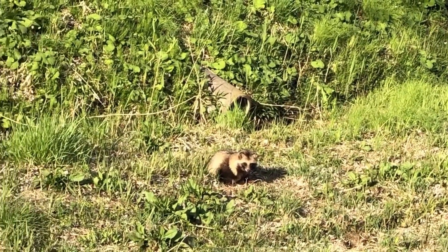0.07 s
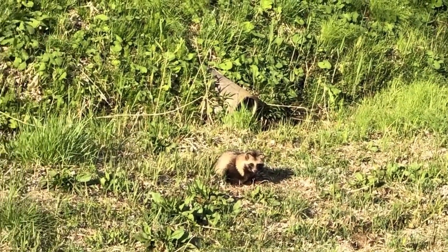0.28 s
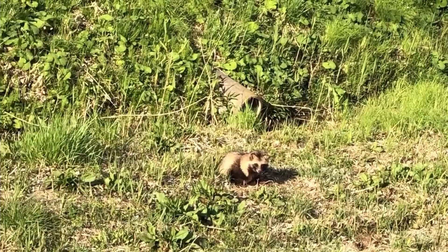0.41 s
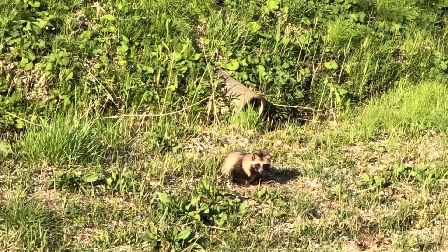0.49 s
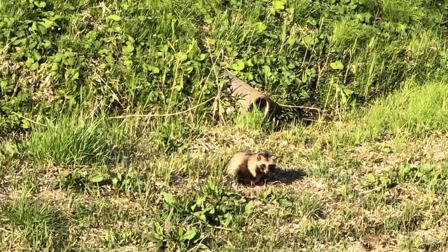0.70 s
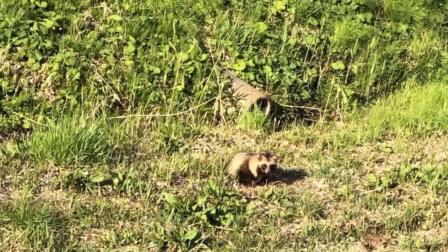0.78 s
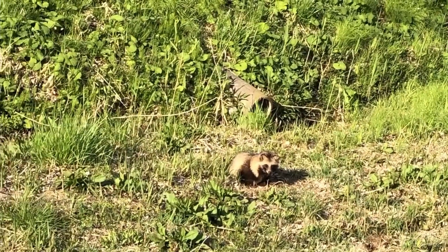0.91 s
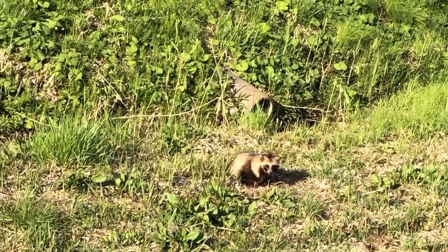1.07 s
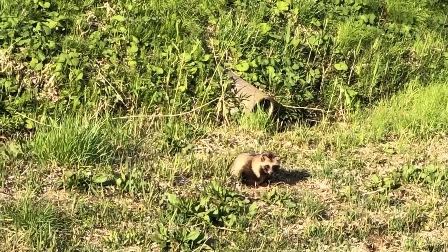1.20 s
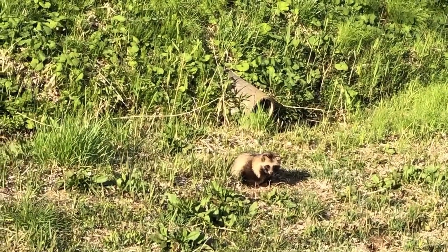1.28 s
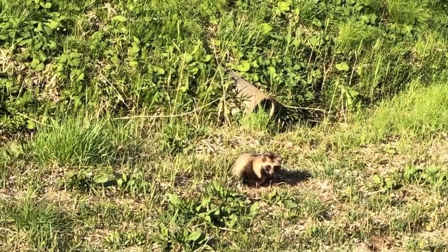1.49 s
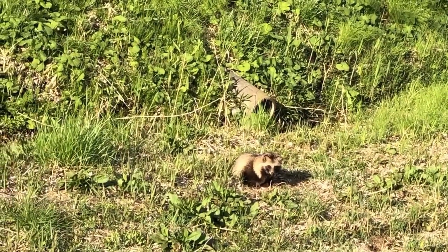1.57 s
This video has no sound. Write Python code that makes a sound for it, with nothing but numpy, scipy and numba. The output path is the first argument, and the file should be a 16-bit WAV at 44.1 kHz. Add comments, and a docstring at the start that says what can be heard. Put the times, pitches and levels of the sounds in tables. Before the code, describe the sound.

A raccoon dog chitters outdoors. After faint low air rumble and distant hum, a weak raspy chirp at 0.23 s leads into seven shrill yelps, evenly spaced about 0.06 s apart, until 0.67 s. A pause follows; a faint rasp at 1.04 s, two strong yelps at 1.09 and 1.16 s, and a short rough one at 1.26 s. Brief ground and leaf reflections; limited, glassy treble.

```python
"""Raccoon dog, two runs of yelps

On a grassy patch, a raccoon dog chitters two quick runs of short, shrill yelps. Each is harmonics on an arch
of pitch: rasping and hissing while low, cleaner at the crest, filtered by throat and mouth.
Ground and a leafy bank scatter it briefly; far off lie shaped-noise air and rumble and a sine hum.
The recorder limits the peaks, and its coarse sampling mirrors the voice into a bright, glassy treble."""
import sys
import numpy as np
from scipy import signal
from scipy.fft import rfft, irfft
from scipy.io import wavfile
from scipy.ndimage import uniform_filter1d, minimum_filter1d
from numba import njit

SR = 44100
rng = np.random.default_rng(int(sys.argv[2]) if len(sys.argv) > 2 else 0)


def store_pcm(level_fs):
    """Save levels as 16-bit WAV."""
    pcm = np.round(np.clip(level_fs, -1, 1) * 32767).astype(np.int16)
    wavfile.write(sys.argv[1], SR, np.atleast_2d(pcm).T)


N = 70560

# Distant air and rumble, relative noise spectrum: f/Hz, level per Hz/dB
AIR_SPECTRUM = [(20, -26), (45, -11.5), (80, -5.5), (120, -5.5), (190, -6), (360, -8.5), (500, -17.5),
                (700, -13.5), (1100, -20.5), (1500, -19), (2100, -26.5), (3500, -27.5), (5500, -28.5)]
# Far machine hum, one tone a row: f/Hz, mean level/dB
HUM_TONES = [(123.8, -52), (360.7, -62.5), (721, -50.5), (1438, -53), (2159, -62.5)]
# Near reflections from ground and bank: delay t/s, level/dB
REFLECTIONS = [(.0072, -19), (.0165, -19)]
# Fixed throat response: f/Hz, level/dB
THROAT_RESPONSE = [(300, -30), (550, -15), (750, -17), (1180, -18), (1420, -19.5), (1800, -4), (2250, 1),
                   (2480, -6), (2700, -14), (3500, -20.5), (4300, -19.5), (4800, -38), (5500, -32.5)]
# The yelps, one a row: start t/s, length t/s, level ahead of the limiter/dB, crest t/s,
# crest pitch f/Hz, slack pitch f/Hz, rise time of the arch t/s, roughness at the crest/0-1,
# hiss when slack/dB, attack t/s, swell over the yelp/dB, level change at the crest/dB, low flutter/dB,
# mouth resonance f/Hz, mouth resonance level/dB, fundamental level/dB
YELP_ROWS = [ (0.2319, 0.017, -19.5, .246, 1000, 810, 0.015, 0.54, 1, 0.0011, 1, 2.5, -44, 3050, 3.5, 9),
             (0.25, 0.036, -9, .277, 1156, 852, 0.018, 0.13, 3.5, 0.0031, 6, 4.5, -39, 3210, 9, 3.5),
             (0.3154, .026, -4.5, .334, 1240, 768, 0.018, 0.05, -3, 0.0027, 6, -4.5, -11.5, 3340, 9, 4.5),
             (0.3723, 0.029, -6.5, .392, 1221, 753, .021, 0.25, -9, 0.0015, 2.5, -6, -20, 3140, 13, 4),
             (.431, 0.032, -5, .453, 1210, 769, .021, 0.1, 3, .006, -2, -3, -27, 3117, 15.5, 3),
             (0.497, 0.033, -3.5, .518, 1182, 770, 0.024, 0.13, -28, 0.0041, -9, -8.5, -21, 3070, 15.5, 4.5),
             (0.5595, 0.028, -6.5, .578, 1169, 725, 0.019, 0.07, -42, 0.0028, -1, -2.5, -22, 3070, 15.5, 4.5),
             (0.611, 0.052, -11, .642, 1115, 750.5, .014, 0.42, 1.5, 0.0027, 2, 5, -50, 3120, 16, 2.5),
             (1.037, 0.03, -21.5, 1.051, 779, 670, 0.01027, 0.74, -10, 0.0064, 12.5, 5.5, -42, 3740, -3.5, 9),
             (1.09, 0.042, -8.5, 1.120, 1209, 793.4, 0.022, 0.05, 0.5, 0.0037, -1.5, 2.5, -20.5, 3620, 14, 0),
             (1.161, 0.063, -7.5, 1.210, 1130, 738, 0.033, 0.17, 1.5, 0.00087, 7, -2.5, -24.5, 3600, 13, -3),
             (1.256, 0.022, -13, 1.266, 745.7, 702.4, 0.0097, 0.9, 10.5, 0.0021, -3.5, 5, -29, 3550, 13.5, -1),
             ]

# Background
AIR_DB, AIR_WAVER_DB = -36, -0.87
# Scatter off the bank: level against the direct voice, decay time to -60 dB
SCATTER_DB, SCATTER_T60_S, FAR_DB, FAR_T60_S = -15.5, .105, -27, .4
# Throat and mouth
MOUTH_WIDTH_HZ, FUNDAMENTAL_BELOW_HZ = 323, 1390
# Pitch arch: flatness of the crest; fall time over rise time
ARCH_POWER, FALL_SHARE = 2.5, 0.76
CLEAN_ABOVE, BREAK_SPAN = 0.61, 0.26  # share of the arch where rasp sets in, and how gradually
# Uneven folds: pitch jitter added by rasp and always present, its speed, then level variations
JITTER, CLEAN_JITTER, JITTER_HZ, SHIMMER, HALF_BEAT = .048, .008, 380, .25, .25
RELEASE_S = 0.0024
THIN_POWER = 39  # how closely the level change hugs the crest
PUFF_HZ, PUFF_WIDE_HZ, PUFF_WIDE_DB = 111, 480, 1.5  # low flutter: deep part and wider part
# Recorder
LIMIT, LIMIT_RELEASE_S = .8, .004
HOLD_SAMPLES, INPUT_TOP_HZ = 4, 5400
ROLL_OFF_HZ, TOP_HZ = 9590, 10300


def amp(db):
    """Decibels to gain."""
    return 10 ** (np.asarray(db) / 20)


def unit(x):
    """Scale to rms 1."""
    return x / np.sqrt(np.mean(x ** 2) + 1e-18)


def wander(hz):
    """Smooth random motion up to about hz, spread 1."""
    f = np.fft.rfftfreq(N, 1 / SR)
    return unit(irfft(rfft(rng.standard_normal(N)) / (1 + (f / hz) ** 4), N))


def shape_db(points, f):
    """Join (Hz, dB) points on a log-frequency axis."""
    p = np.array(points)
    return np.interp(np.log(f + 1), np.log(p[:, 0]), p[:, 1])


def resonate(x, db, size=2048):
    """Causal, minimum-phase filter with the given dB response, by folding its cepstrum."""
    cepstrum = irfft(np.log(amp(db)), size)
    cepstrum[1:size // 2] *= 2
    cepstrum[size // 2 + 1:] = 0
    impulse = irfft(np.exp(rfft(cepstrum)), size)
    return signal.fftconvolve(x, impulse)[:N]


def distant_air():
    """Distant rumble and thin air: noise shaped in frequency, its level wavering."""
    f = np.fft.rfftfreq(N, 1 / SR)
    air = unit(irfft(rfft(rng.standard_normal(N)) * amp(shape_db(AIR_SPECTRUM, f)), N))
    return air * amp(AIR_DB + AIR_WAVER_DB * wander(24))


def machine_hum():
    """Far machine: sine tones that each waver in level and pitch."""
    hum = np.zeros(N)
    for hz, db in HUM_TONES:
        level = amp(db + 2 * wander(1.7)) * np.sqrt(2)
        phase = 2 * np.pi * np.cumsum(hz * (1 + 0.0039 * wander(10))) / SR
        hum += level * np.sin(phase)
    return hum


def bank(x):
    """Near reflections as delayed copies; leaf scatter and a faint far tail as decaying noise responses."""
    t = np.arange(N) / SR
    out = x + sum(amp(db) * np.interp(t - lag, t, x, left=0) for lag, db in REFLECTIONS)
    for db, t60 in ((SCATTER_DB, SCATTER_T60_S), (FAR_DB, FAR_T60_S)):
        decay = np.exp(-np.log(1000) * t / t60)
        build_up = np.minimum(t / 0.0091, 1) ** 2
        tail = rng.standard_normal(N) * decay * build_up
        out = out + amp(db) * signal.fftconvolve(x, unit(tail) / np.sqrt(N))[:N]
    return out


def throat(mouth_hz, mouth_db, fundamental_db, size=2048):
    """The fixed throat, a mouth resonance that moves from yelp to yelp, and the weight of the fundamental."""
    f = np.fft.rfftfreq(size, 1 / SR)
    mouth = mouth_db * np.exp(-((f - mouth_hz) / MOUTH_WIDTH_HZ) ** 2)
    fundamental = fundamental_db / (1 + (f / FUNDAMENTAL_BELOW_HZ) ** 10)
    return shape_db(THROAT_RESPONSE, f) + mouth + fundamental


def yelp(start, length, db, crest, crest_hz, slack_hz, rise, rough, hiss_db, attack,
         swell_db, thin_db, puff_db, *mouth, count=9):
    """One arch of pitch; the folds beat unevenly and hiss wherever the voice is slack."""
    t = np.arange(N) / SR
    on = (t >= start) & (t < start + length + 10 * RELEASE_S)
    age, past = t[on] - start, t[on] - crest

    side = rise * np.where(past > 0, FALL_SHARE, 1)
    arch = np.maximum(1 - np.abs(past / side) ** ARCH_POWER, 0)
    slack = np.clip((CLEAN_ABOVE - arch) / BREAK_SPAN, 0, 1)
    rasp = np.clip(rough + slack, 0, 1)

    jitter = (CLEAN_JITTER + JITTER * rasp) * wander(JITTER_HZ)[on]
    hz = (slack_hz + (crest_hz - slack_hz) * arch) * (1 + jitter)
    phase = 2 * np.pi * np.cumsum(hz) / SR
    folds = unit(sum(np.cos(k * phase) for k in range(1, count)))
    # strong and weak cycles alternate
    unevenness = SHIMMER * wander(JITTER_HZ)[on] + HALF_BEAT * np.cos(phase / 2)
    folds = folds * (1 + rasp * unevenness)
    # breath noise pulses with each cycle
    hiss = amp(hiss_db) * rasp * (1 + np.cos(phase)) * rng.standard_normal(N)[on]

    effort = (1 - np.exp(-age / attack)) * np.exp(-np.maximum(age - length, 0) / RELEASE_S)
    swell = swell_db * (np.minimum(age / length, 1) - .5)
    effort = effort * amp(swell + thin_db * arch ** THIN_POWER)

    source, puff = np.zeros(N), np.zeros(N)
    source[on] = (folds + hiss) * effort
    flutter = wander(PUFF_HZ) + amp(PUFF_WIDE_DB) * wander(PUFF_WIDE_HZ)
    puff[on] = amp(puff_db) * effort * np.sqrt(rasp) * flutter[on]
    # level the voice over the yelp's own length; the flutter bypasses the throat
    voice = unit(resonate(source, throat(*mouth))) * np.sqrt(length * SR / N)
    return amp(db) * (voice + puff)


def scene():
    """The yelps off ground and bank, over the distant background."""
    background = distant_air() + machine_hum()
    voice = sum(yelp(*row) for row in YELP_ROWS)
    return (bank(voice) + background)[None]


@njit
def peak_hold(x, fall):
    """Follows peaks at once and lets go exponentially."""
    out, e = np.empty(len(x)), 0.
    for i in range(len(x)):
        e = max(abs(x[i]), e * fall)
        out[i] = e
    return out


def record(dry):
    """A fast limiter; then coarse samples, each held flat, mirror the sound into the treble; the top is cut."""
    peak = peak_hold(dry[0], np.exp(-1 / (LIMIT_RELEASE_S * SR)))
    gain = LIMIT / np.maximum(peak, LIMIT)
    # duck slightly ahead of each peak, with smooth edges
    gain = uniform_filter1d(minimum_filter1d(gain, size=33), size=33)
    narrow = signal.sosfilt(signal.butter(10, INPUT_TOP_HZ, fs=SR, output="sos"), dry[0] * gain)
    steps = np.repeat(narrow[::HOLD_SAMPLES], HOLD_SAMPLES)[:N]
    soft = signal.sosfilt(signal.butter(10, ROLL_OFF_HZ, fs=SR, output="sos"), steps)
    return signal.sosfilt(signal.ellip(8, .2, 70, TOP_HZ, fs=SR, output="sos"), soft)[None]


dry = scene()
out = record(dry)
store_pcm(out)
```